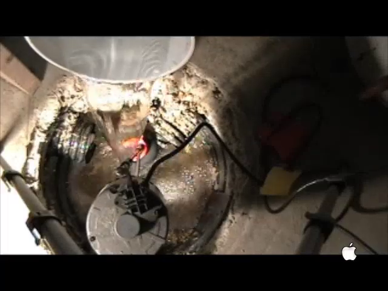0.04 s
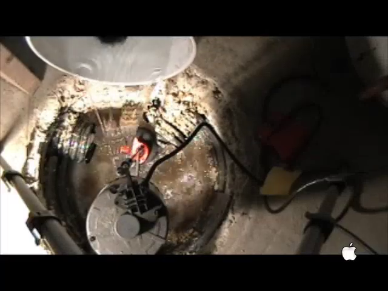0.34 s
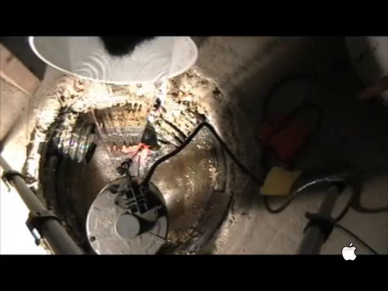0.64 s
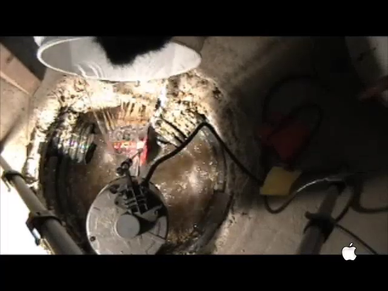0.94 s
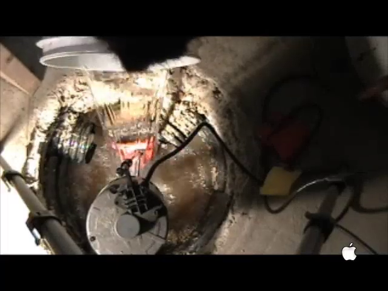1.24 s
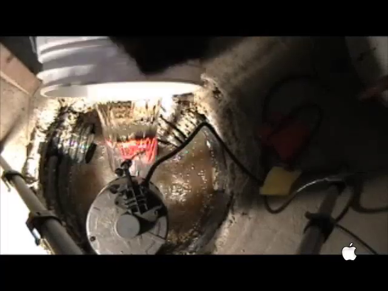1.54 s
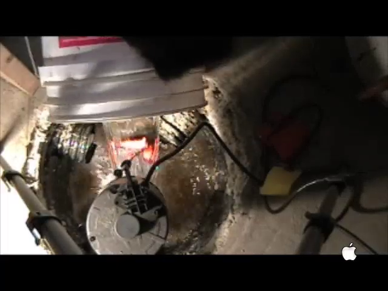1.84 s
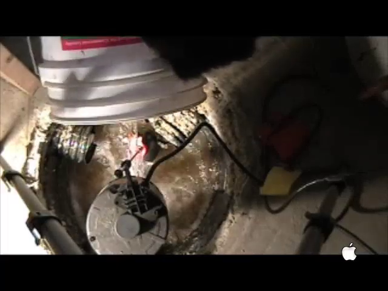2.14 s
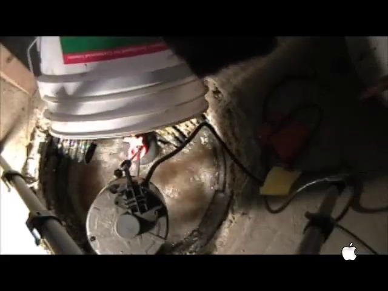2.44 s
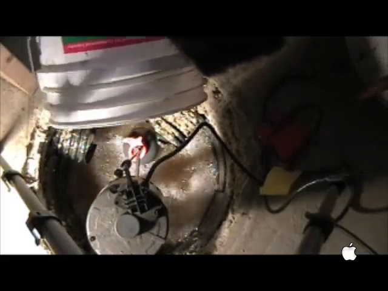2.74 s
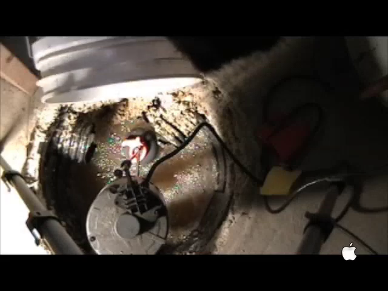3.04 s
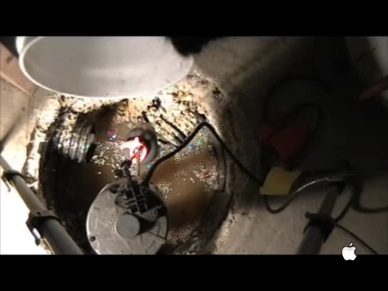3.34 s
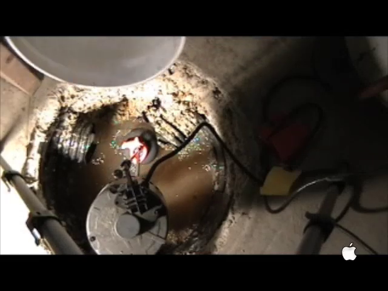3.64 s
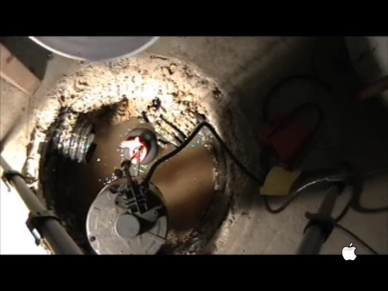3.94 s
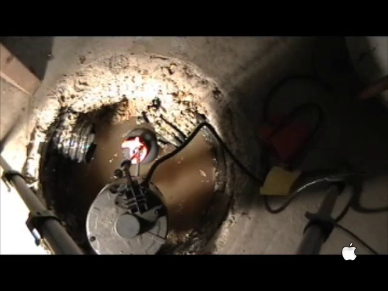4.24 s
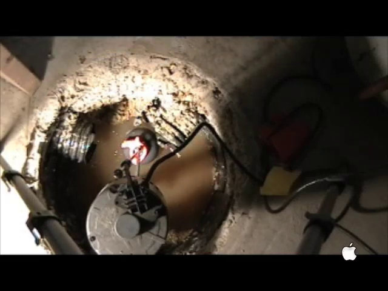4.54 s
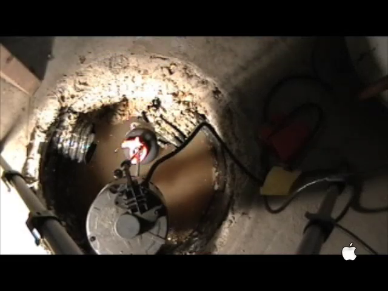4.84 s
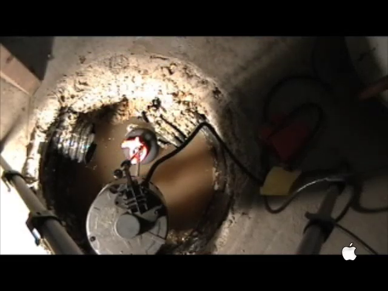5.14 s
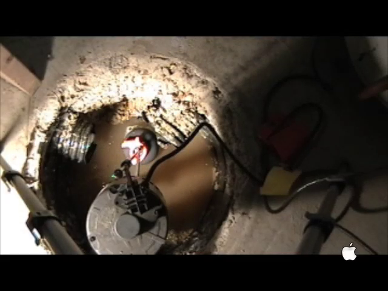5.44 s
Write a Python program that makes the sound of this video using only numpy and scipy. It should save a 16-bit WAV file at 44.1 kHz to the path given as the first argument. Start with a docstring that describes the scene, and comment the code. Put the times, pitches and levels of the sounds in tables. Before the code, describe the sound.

A loud, hollow splashing pour thins to plinking drips and fizz, followed by sleeve rustle and a few plastic bucket knocks.

```python
"""Emptying a bucket into a sump pit

Water pours over the pump and onto standing water, breaking into spray and bubbles that ring in the
basement pit. The stream thins to last splats, plinking drips and fizzing foam. Then sleeves rustle
as the empty plastic bucket is carried aside; it knocks a few times, is set down, and its handle drops."""
import sys
import numpy as np
from scipy import signal
from scipy.fft import rfft, irfft
from scipy.io import wavfile

SR = 44100
rng = np.random.default_rng(int(sys.argv[2]) if len(sys.argv) > 2 else 0)


def store_wav(level_fs):
    """Save 16-bit WAV to argv[1]."""
    pcm = np.round(np.clip(np.atleast_2d(level_fs), -1, 1) * 32767)
    wavfile.write(sys.argv[1], SR, pcm.T.astype(np.int16))


N = 246078
TIME = np.arange(N) / SR


def amp(db):
    """Turns decibels into a number to multiply by."""
    return 10 ** (np.asarray(db) / 20)


def unit_rms(x):
    """Scales a sound to an average (rms) size of one."""
    return x / np.sqrt(np.mean(x ** 2) + 1e-20)


def unit_peak(x):
    """Scales a sound to a peak of one."""
    return x / (abs(x).max() + 1e-20)


def fade(t, fade_s):
    """Dies away by 60 dB in fade_s seconds; "fade" in the tables means this time."""
    return np.exp(-np.log(1000) * t / fade_s)


def read(points, hz):
    """Looks up a table's value at any frequency."""
    f, value = np.transpose(points)
    return np.interp(np.log(hz + 1), np.log(f + 1), value)


def follow(rows):
    """Joins a table's points in time, giving one curve per column."""
    s, *columns = np.transpose(rows)
    return [np.interp(TIME, s, c) for c in columns]


def add(mix, s, sound):
    """Mixes a sound in at s seconds."""
    part = mix[max(round(s * SR), 0):][:len(sound)]
    part += sound[:len(part)]


def colour(x, db_at, size=8192):
    """Turns each frequency up or down by db_at(hz) decibels."""
    hz = abs(np.fft.fftfreq(size, 1 / SR))
    log_gain = np.log(amp(np.maximum(db_at(hz), -100)))
    response = np.exp(np.conj(signal.hilbert(log_gain)))  # rings only after a sound, never before
    taps = np.fft.ifft(response).real[:size // 2]
    return signal.oaconvolve(x, taps)[:len(x)]


def cut(x, hz, kind, order=4):
    """Keeps the low part, the high part or one band of a sound."""
    return signal.sosfilt(signal.butter(order, hz, kind, fs=SR, output="sos"), x)


def bands(low, mid, high, edges_hz=(450, 2500)):
    """The bass of the first sound, the middle of the second and the treble of the third."""
    return cut(low, edges_hz[0], "low"), cut(mid, edges_hz, "band"), cut(high, edges_hz[1], "high")


def wander(per_s):
    """A smooth random wobble; per_s sets its speed."""
    f = np.fft.rfftfreq(N, 1 / SR)
    return unit_rms(irfft(rfft(rng.standard_normal(N)) * (f / per_s) * np.exp(-f / per_s), N))


def resonate(x, hz, width_hz):
    """Makes a sound ring around the pitch curve hz."""
    turn = np.exp(2j * np.pi * np.cumsum(hz) / SR)
    keep = np.exp(-np.pi * width_hz / SR)
    return 2 * (turn * signal.lfilter([1 - keep], [1, -keep], x / turn)).real


# Notes at which the air in the pit rings: f/Hz, width/Hz, boost/dB
PIT_NOTES = [(116.7, 9.4, 8.5), (206, 27, 10), (535.6, 22, 6.5), (769, 45, 4.5), (932, 6.2, 8.5),
             (1182, 17, 4.5), (1560, 14, 8.5), (2152, 35, 6)]
def hollow(hz, spacing_hz=300):
    """The pit's hollow tone in dB: its own notes, plus evenly spaced dips that fade in the treble."""
    dips = 1 / (1 + (np.sin(np.pi * hz / spacing_hz) / 0.13) ** 2)
    boosts = sum(db / (1 + (2 * (hz - f) / width) ** 2) for f, width, db in PIT_NOTES)
    return boosts - 12 * dips / (1 + (hz / 6500) ** 2)


# How long echoes last, before stretch multiplies it: f/Hz, fade/s
ECHO_FADES = [(150, 0.47), (500, 0.18), (1200, 0.17), (3000, 0.14), (10000, 0.12)]
def echoes(x, stretch, size=16384, count=4, turns_hz=2.3):
    """Dense echoes whose treble dies first; their pattern shifts as water and bucket move."""
    taps = rng.choice([-1., 1.], (count, size)) * (rng.random((count, size)) < .15)
    taps *= np.arange(size) > .0015 * SR  # gap before the first echo
    hz, t, spectrum = signal.stft(taps, SR, nperseg=256)
    spectrum = spectrum * fade(t, stretch * read(ECHO_FADES, hz)[:, None])
    tails = signal.istft(spectrum, SR, nperseg=256)[1]
    tails /= np.linalg.norm(tails, axis=1)[:, None]
    shares = np.maximum(np.cos(2 * np.pi * (turns_hz * TIME + np.arange(count)[:, None] / count)), 0)
    return signal.oaconvolve(x * shares, tails, axes=1)[:, :N].sum(0)


def room(x, echo_db):
    """A sound plus its echoes off the concrete close by."""
    return (x + amp(echo_db) * echoes(x, stretch=0.86)) / np.hypot(1, amp(echo_db))


def bubble(hz, fade_s, rise):
    """A pocket of air rings; nearing the surface, its pitch climbs by rise octaves a second."""
    t = np.arange(int(fade_s * SR) + 2) / SR
    turns = np.cumsum(np.minimum(hz * 2 ** (rise * t), SR / 2)) / SR
    return np.sin(2 * np.pi * turns) * fade(t, fade_s) * (1 - np.exp(-2 * hz * t))


def swarm(lo_hz, hi_hz, density, cycles, spread_db, clump_db, count=16, size=4096):
    """Bubbles and droplets of many sizes arrive in clumps; small, high ones come more often."""
    out = np.zeros(N)
    for hz in np.geomspace(lo_hz, hi_hz, count):
        arrivals = int(density / count * np.sqrt(hz / lo_hz) * N / SR) + 1
        when, luck, sign = rng.random((size, 3))[:arrivals].T
        clumps = np.interp(when, np.linspace(0, 1, 256), rng.standard_normal(256))
        strength = amp(spread_db * np.minimum(-np.log(1 - luck), 4) + clump_db * clumps)
        clicks = np.bincount((when * N).astype(int), strength * np.sign(sign - .5), N)
        ring = bubble(hz, cycles / hz, rise=0.2 * hz / cycles)
        out += np.sqrt(hz) * unit_rms(signal.oaconvolve(clicks, ring)[:N])
    return unit_rms(out)


# Tone of the quiet basement: f/Hz, level/dB
HUSH_TONE = [(18, -42), (30, -11), (124, 8), (316, -22), (442, 3.5), (602, -15), (1610, -3), (2080, -19.5),
             (8870, -10.5), (14500, -18)]
def hush(level_db=-58):
    """A faint, steady noise fills the basement."""
    return amp(level_db) * unit_rms(colour(rng.standard_normal(N), lambda hz: read(HUSH_TONE, hz)))


# Tone of the pouring water: f/Hz, level/dB
WATER_TONE = [(24, -42), (40, -24.5), (113, -4.5), (155, -12), (209, -8), (295, -6.5), (533, -5.5),
              (588, -5), (752, -2.5), (1040, -2), (1580, 1), (2460, -4), (9540, -12.5), (12800, -17.5),
              (14500, -27)]
# The stream, until it runs out: t/s, level/dB, spray off the pump compared with that level/dB
STREAM = [(0.0, -23.5, -6), (0.24, -28.5, 1), (0.46, -30, -1), (0.78, -29, -0.5), (0.9, -25, -0.5),
          (1.1, -26, -0.5), (1.3, -24.5, -3.5), (1.55, -26, -2), (1.74, -24, -1), (1.92, -24.5, 1),
          (2.08, -26.5, -0.5), (2.29, -28.5, 2.5), (2.42, -40.5, 6), (2.53, -44.5, 3), (2.66, -58, -18)]
# Thick gushes that dive under the surface: t/s, length/s, churn boost/dB, plunge boost/dB
DIVING_GUSHES = [(0.138, 0.11, 4.5, 12.5), (0.397, 0.26, 6.5, 9), (0.733, 0.11, -2.5, 6.5),
                 (1.2, 0.11, 3.5, 6), (1.735, 0.1, 4, 2), (2.105, 0.07, -1, 5)]
def pour(mist_hz=7000, mist_db=-3):
    """The stream plunges deep, churns up bubbles and throws spray, all surging together."""
    flow_db, spray_db = follow(STREAM)
    churn_db, plunge_db = flow_db, -30.5 + 0.49 * flow_db
    for s, length, churn_boost, plunge_boost in DIVING_GUSHES:
        arch = np.cos(np.pi * np.clip((TIME - s) / length, -.5, .5)) ** 2
        churn_db = churn_db + churn_boost * arch
        plunge_db = plunge_db + plunge_boost * arch
    plunge = swarm(60, 600, density=500, cycles=5.3, spread_db=4, clump_db=2.5)
    churn = swarm(377.2, 3130, density=1300, cycles=23.4, spread_db=2.5, clump_db=2, count=44)
    long_rings = swarm(503, 3020, density=110, cycles=76, spread_db=2, clump_db=2, count=30)
    churn += amp(-7.5) * long_rings
    drops = swarm(1963, 14240, density=4200, cycles=15, spread_db=0, clump_db=1.66, count=24)
    layers = plunge, churn, room(drops, echo_db=-6)
    low, mid, high = bands(*[colour(x, lambda hz: read(WATER_TONE, hz) + hollow(hz)) for x in layers])
    spray, mist = cut(high, mist_hz, "low", order=5), cut(high, mist_hz, "high", order=5)
    surge = wander(per_s=12)
    body = amp(churn_db) * unit_rms(mid) + amp(plunge_db) * unit_rms(low)
    hiss = amp(flow_db + spray_db) * (unit_rms(spray) + amp(mist_db) * unit_rms(mist))
    return body * amp(0.41 * surge) + hiss * amp(.8 * surge)


# Clouds of air pushed under water: t/s, length/s, level/dB, first f/Hz, last f/Hz
AIR_CLOUDS = [(0.0, 0.17, -27, 798, 683), (0.404, 0.14, -29.5, 1600, 1290), (0.536, 0.2, -36, 1360, 1220),
              (0.664, 0.26, -33.5, 970, 980), (0.817, 0.21, -32, 1296, 1540),
              (1.115, 0.12, -36.5, 890, 705), (1.351, .13, -32.5, 765, 506), (1.704, 0.053, -23, 880, 995),
              (1.765, 0.13, -32.5, 800, 720), (1.968, 0.14, -30, 796, 696), (2.259, 0.055, -27, 1634, 1690)]
def glugs(bubbles_per_s=130, scatter_octaves=0.078, cycles=44, width_hz=70, size=64):
    """A string of bubbles breaks off and the whole cloud rings as one, sliding in pitch."""
    out = np.zeros(N)
    for s, length, db, first_hz, last_hz in AIR_CLOUDS:
        when, scatter, strength = rng.random((size, 3)).T
        hz = np.geomspace(first_hz, last_hz, int(length * SR))
        string = np.zeros(len(hz))
        for k in range(min(int(length * bubbles_per_s), size)):
            at = (k + when[k]) / bubbles_per_s
            pitch = first_hz * (last_hz / first_hz) ** (at / length)
            pitch *= 2 ** (scatter_octaves * (2 * scatter[k] - 1))
            add(string, at, (.5 + strength[k]) * bubble(pitch, cycles / pitch, rise=2.2))
        noise = rng.standard_normal(SR)[:len(hz)]
        cloud = resonate(resonate(noise, hz, 2 * width_hz), hz, width_hz)
        glug = amp(-1) * unit_rms(string) + amp(-2.5) * unit_rms(cloud)
        add(out, s, amp(db) * unit_rms(glug * signal.windows.tukey(len(hz), .5)))
    return out


# Tone shared by the splats, the drips' splashes and the handle: f/Hz, level/dB
IMPACT_TONE = [(100, -4), (600, 1), (8000, -2), (11000, -3.5), (14500, -8.5)]
def impacts(rows, size=11025):
    """Each hit is a quickly fading burst of noise around one pitch."""
    out, t = np.zeros(N), np.arange(size) / SR
    for s, db, centre_hz, fade_s, octaves in rows:
        def tone(hz):
            distance = np.log2((hz + 1) / centre_hz) / octaves
            return hollow(hz) + read(IMPACT_TONE, hz) - 22 * np.log10(1 + distance ** 2)
        burst = rng.standard_normal(size) * fade(t, fade_s) * (1 - np.exp(-t / 0.0013))
        add(out, s, amp(db) * unit_peak(colour(burst, tone)))
    return out


# Water landing: t/s, level/dB, f/Hz, fade/s, width/octaves
WATER_HITS = [(0.033, -12, 1700, 0.17, 1.4), (0.046, -11.5, 3030, 0.18, 0.55),
              (0.137, -13.5, 1710, 0.076, 0.82), (0.192, -11, 2590, 0.14, 0.97),
              (0.244, -12, 1870, 0.27, 2.4), (0.37, -10, 1580, 0.12, 0.72), (0.419, -17, 2100, 0.1, 1),
              (0.552, -14.5, 1670, 0.11, 0.77), (0.677, -13.5, 1090, 0.17, 2.4),
              (0.817, -17.5, 1260, 0.083, 0.77), (1.625, -13, 1290, 0.13, 0.9),
              (1.716, -13.5, 970, 0.11, 1.6), (2.269, -27, 1620, 0.11, 0.68), (2.289, -14, 1660, 0.11, 0.8),
              (2.336, -14.5, 1960, 0.065, 0.66), (2.402, -18, 2400, 0.11, 0.78),
              (2.426, -26, 3080, 0.19, 0.73), (2.463, -16, 6540, 0.1, 1.7),
              (2.522, -11.5, 4140, 0.077, 1.6), (2.662, -27, 8000, 0.073, 2.4),
              (2.688, -32, 3880, 0.074, 0.61), (2.736, -31, 2250, 0.19, 0.63),
              (2.804, -28, 3280, 0.1, 0.91), (2.861, -22, 4300, 0.083, 0.68),
              (2.916, -30.5, 10500, 0.05, 0.67), (2.970, -37, 12000, 0.072, 0.69),
              (3.008, -36, 7100, 0.066, 0.3), (3.135, -38, 12000, .08, 0.54),
              (3.182, -36, 11000, 0.12, 0.5), (3.263, -30, 7700, 0.059, 1.1),
              (3.355, -41, 5770, 0.12, 0.21), (3.502, -36, 1370, 0.11, .8), (3.787, -34, 9050, 0.039, 0.12),
              (3.823, -32.5, 3920, 0.047, 0.3), (4.087, -33.5, 7100, 0.034, 0.16)]
def splats():
    """Lumps of water and last drops slap the pump or the surface."""
    return impacts(WATER_HITS)


# Dull booms of the bucket's base: t/s, level/dB, f/Hz, fade/s, stopped after/s
BASE_BOOMS = [(0.135, -14, 122, 0.076, .12), (3.237, -40, 142, 0.23, 0.15), (3.863, -31, 112, 1, .24),
              (4.249, -34.5, 137, 0.16, .08), (4.793, -40, 98, 0.16, 0.11), (5.3, -19.5, 285, 0.19, .12),
              (5.344,  -11, 203, 0.1, .14), (5.502, -28, 216, 0.14, .1)]
def booms():
    """The bendy base swings at a low pitch until hand or floor stops it."""
    out = np.zeros(N)
    for s, db, hz, fade_s, length in BASE_BOOMS:
        t = TIME[:int(length * SR)]
        gate = np.clip(t / 0.0079, 0, 1) * np.clip((length - t) / 0.018, 0, 1)
        add(out, s, amp(db) * gate * np.sin(2 * np.pi * hz * t) * fade(t, fade_s))
    return out


# Single large bubbles: t/s, level/dB, f/Hz, fade/s, rise/(octaves per s)
DRIP_BUBBLES = [(1.721, -23, 937, 0.098, 0.61), (2.778, -42, 680, .07, 8), (2.931, -34, 1230, 0.086, 6.6),
                (2.948, -28.5, 1790, .025, 41), (2.998, -24.5, 1316, 0.081, 7),
                (3.092, -38.5, 712, 0.14, 9), (3.114, -25.5, 1680, 0.044, 37), (3.158, -40, 1900, .04, 6),
                (3.366, -28.5, 1057, 0.041, 8), (3.393, -42, 1220, 0.072, 8), (3.451, -30, 978, 0.13, 1.8)]
def plinks():
    """A large drop splashes softly and traps one ringing bubble."""
    rings = np.zeros(N)
    for s, db, hz, fade_s, rise in DRIP_BUBBLES:
        add(rings, s, amp(db) * bubble(hz, fade_s, rise))
    splashes = [(s, db, 1.1 * hz, .07, .6) for s, db, hz, _, _ in DRIP_BUBBLES]
    return room(rings, echo_db=-8) + amp(-6.5) * impacts(splashes)


# Loudness of the run-off and foam: t/s, level/dB
TRICKLE_LEVEL = [(2.3, -64), (2.55, -46), (3.2, -48.5), (3.8, -50.5), (3.92, -56.5), (5.58, -54.5)]
# Their tone: f/Hz, level/dB
FOAM_TONE = [(35, -39), (60, -9), (134, 10), (293, -10), (716, 2), (861, -4.5), (988, -1), (4500, 2),
             (10000, -4), (14500, -13)]
def trickle():
    """Water runs off the pump and the foam fizzes as its bubbles burst."""
    level_db, = follow(TRICKLE_LEVEL)
    fizz = swarm(300, 14000, density=900, cycles=24, spread_db=2.2, clump_db=1.5, count=40)
    fizz = room(fizz, echo_db=0)
    return amp(level_db) * unit_rms(colour(fizz, lambda hz: read(FOAM_TONE, hz)))


# Notes of the bucket's wall and base: f/Hz, level/dB, fade/s (before ring_scale shortens it)
BUCKET_NOTES = [(201.4, -1, 0.22), (280, -6, 0.13), (415.6, -5.5, 0.29), (526, 0.5, 0.17),
                (779.5, -20, 0.53), (936, -3.5, 0.17), (1005.4, 7.5, 0.069), (1164, -4, 0.14),
                (1226, -28, 0.55), (1443, 10, 0.031), (1608, -8.5, 0.22), (2170, -35, 0.25),
                (2540, -43, 0.56), (2850, -37, 0.65)]
# Tone of chattering plastic: f/Hz, level/dB
PLASTIC_TONE = [(35, -28), (60, -31), (175, 3), (457, -8), (658, -8.5), (1140, -8.5), (1430, -11),
                (2110, -20), (2530, -22), (3400, -36), (6300, -35), (7220, -42.5), (14000, -55)]
# Blows on the bucket: t/s, level/dB, bass/dB, click/dB, contact/s, struck spot's f/Hz
BUCKET_BLOWS = [(3.858, -27.5, -4.5, -26, 0.0034, 1190), (3.895, -15.5, -42, -21.5, 0.0029, 1080),
                (4.251, -25.5, -12, -20, 0.0042, 635), (4.642, -38.5, -16, -27, 0.008, 865),
                (5.128, -20.5, -17, -20.5, .005, 1360), (5.299, -15.5, 5.5, -15.5, 0.0049, 945),
                (5.313, -8.5, -5.5, -22, 0.0035, 1150), (5.489, -41.5, -1, -1.5, .006, 1660)]
def knocks(ring_scale=0.71, size=17640):
    """The soft rim chatters at each blow; wall and base ring on, most near the struck spot's pitch."""
    out, t = np.zeros(N), np.arange(size) / SR
    ring = sum(amp(db) * np.sin(2 * np.pi * hz * t) * fade(t, ring_scale * fade_s)
               for hz, db, fade_s in BUCKET_NOTES)
    for s, db, bass_db, click_db, contact, spot_hz in BUCKET_BLOWS:
        press = 1 - np.exp(-t / contact)
        release = np.exp(-t / contact) + 0.099 * np.exp(-t / 0.026)
        chatter = rng.standard_normal(size) * press * release
        chatter = colour(chatter, lambda hz: read(PLASTIC_TONE, hz) + .5 * hollow(hz))
        blow = unit_peak(chatter) + amp(-3.5) * unit_peak(ring * press)
        blow += amp(6) * resonate(blow, np.full(size, spot_hz), width_hz=350)
        low, mid, high = map(unit_peak, bands(blow, blow, blow))
        add(out, s, amp(db) * (amp(bass_db - 1.5) * low + mid + amp(click_db + 8.5) * high))
    return room(out, echo_db=-9.5)


# Tone of rubbing cloth: f/Hz, level/dB
CLOTH_TONE = [(100, -25), (200, -6.5), (320, -14), (420, -6.5), (620, -11), (1000, 2), (1700, -3),
              (2400, -9), (4500, -16), (5800, -9.5), (7200, -17), (9300, -15), (12000, -30), (14500, -38)]
# Strokes of the sleeves: t/s, length/s, body level/dB, hiss level/dB, swish level/dB, first swish f/Hz
SLEEVE_STROKES = [(4.141, 0.25, -60.5, -77, -56, 1750), (4.387, 0.047, -62, -64, -45, 1450),
                  (4.263, 0.39, -64, -53, -65, 1670), (4.62, 0.31, -57.5, -64, -79, 1600),
                  (4.853, 0.31, -50.5, -49.5, -48.5, 3980), (4.96, 0.29, -49, -60, -52, 2900),
                  (5.228, 0.13, -44.5, -49, -49.5, 3660), (5.493, 0.059, -46, -43, -44, 3580),
                  (5.54, 0.082, -54, -59, -51.5, 3600)]
def rustle(swell_s=0.016, release_s=0.052, sink_octaves_per_s=1.3):
    """Cloth slides as the bucket is carried aside; each stroke's swish sinks in pitch as it slows."""
    friction = rng.standard_normal(N) * amp(0.96 * wander(per_s=30))
    cloth = colour(friction, lambda hz: read(CLOTH_TONE, hz) + hollow(hz))
    low, mid, high = bands(cloth, cloth, cloth)
    body, hiss = unit_rms(low + mid), unit_rms(high)
    out = np.zeros(N)
    for s, length, body_db, hiss_db, swish_db, first_hz in SLEEVE_STROKES:
        during = (TIME >= s) & (TIME < s + length)
        t = TIME[during] - s
        hz = first_hz * 2 ** (-sink_octaves_per_s * t)
        swish = resonate(resonate(friction[during], hz, 1400), hz, 1400)
        swish = unit_rms(colour(swish, hollow))
        press = np.minimum(t / swell_s, 1) * np.minimum((length - t) / release_s, 1)
        stroke = amp(body_db) * body[during] + amp(hiss_db) * hiss[during] + amp(swish_db) * swish
        add(out, s, press * stroke)
    return out


# The handle landing: t/s, level/dB, f/Hz, fade/s, width/octaves
HANDLE_HIT = [(5.372, -15, 7330, 0.09, 0.5)]
def handle():
    """The wire handle drops with one bright click."""
    return impacts(HANDLE_HIT)


# Strength of the echoes that spread the sound left and right: f/Hz, level/dB
STEREO_SPREAD = [(100, -49), (250, -22), (600, -14), (2000, -13), (4500, -11), (8000, -11.5), (14000, -3)]
def scene():
    """Water and bucket over the basement's hush; nearby walls spread them between the ears."""
    background = hush()
    water = pour() + glugs() + splats() + trickle() + plinks()
    centre = background + water + booms() + knocks() + handle() + rustle()
    side = colour(echoes(centre, stretch=0.42), lambda hz: read(STEREO_SPREAD, hz))
    return np.array([(centre + side) * amp(-2.26), (centre - side) * amp(-1.38)])


def record(dry):
    """A small microphone misses the deepest bass and the highest treble."""
    thin = cut(dry, 50, "high", order=3)
    treble_cut = signal.firwin(301, 14600, window=("kaiser", 9), fs=SR)
    return signal.oaconvolve(thin, treble_cut[None], "same")


dry = scene()
out = record(dry)
store_wav(out)
```